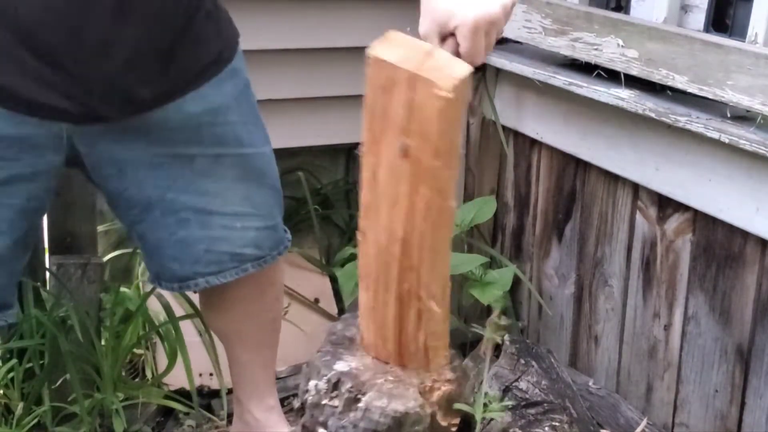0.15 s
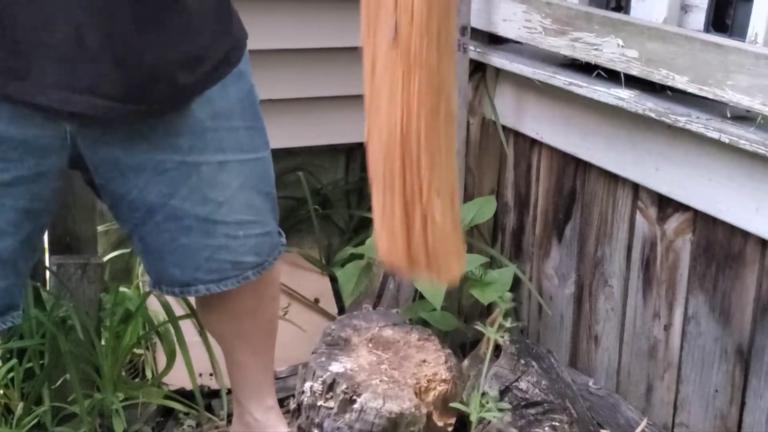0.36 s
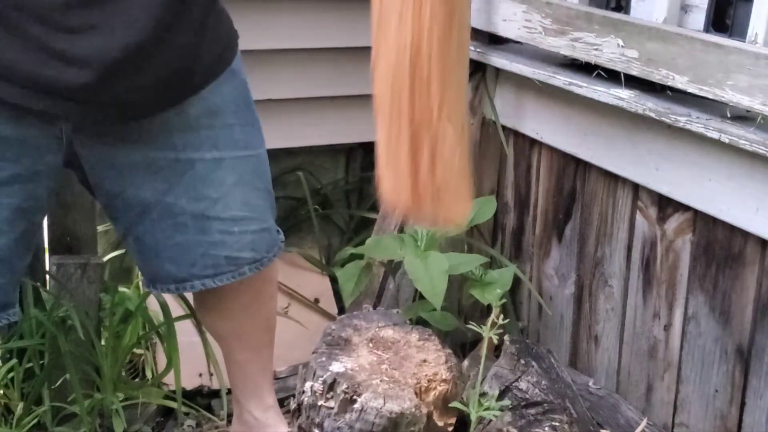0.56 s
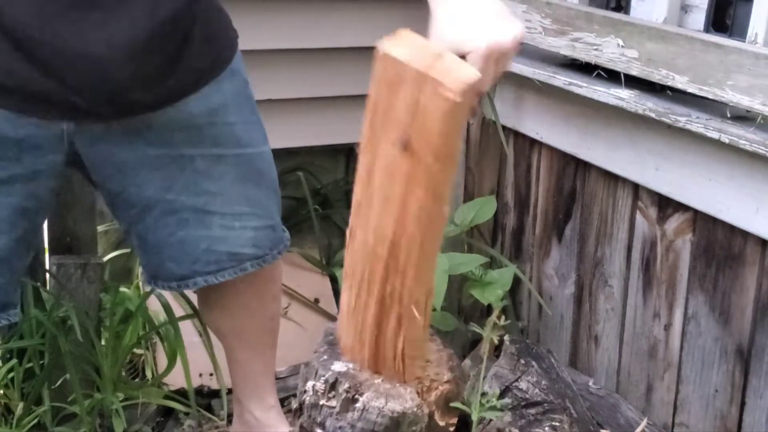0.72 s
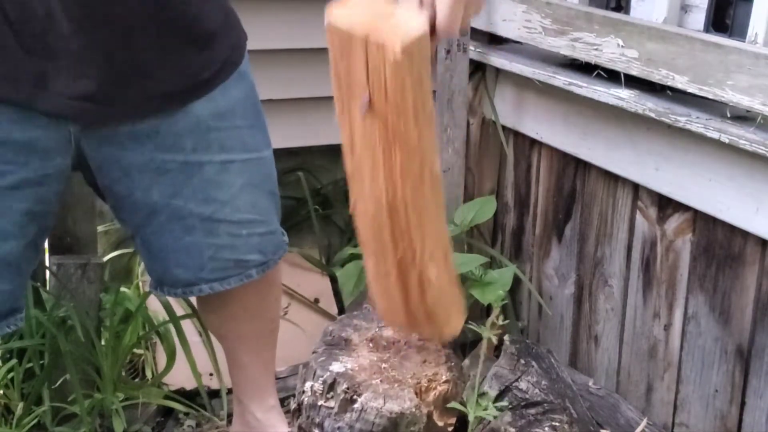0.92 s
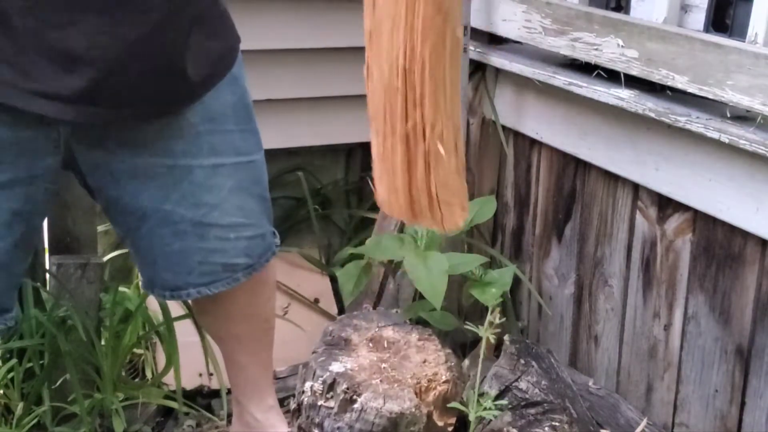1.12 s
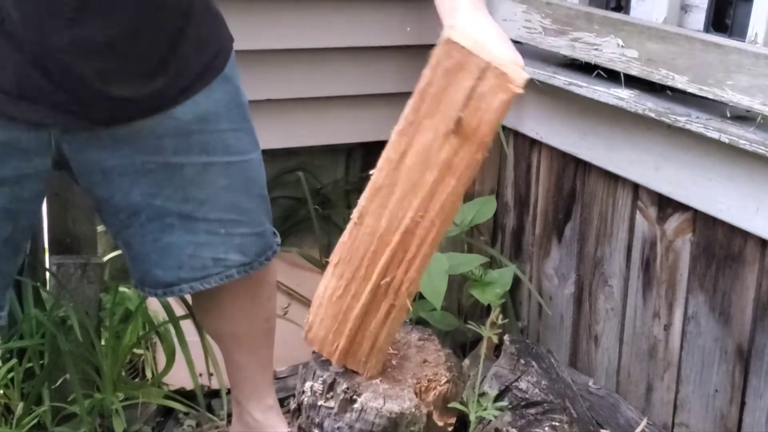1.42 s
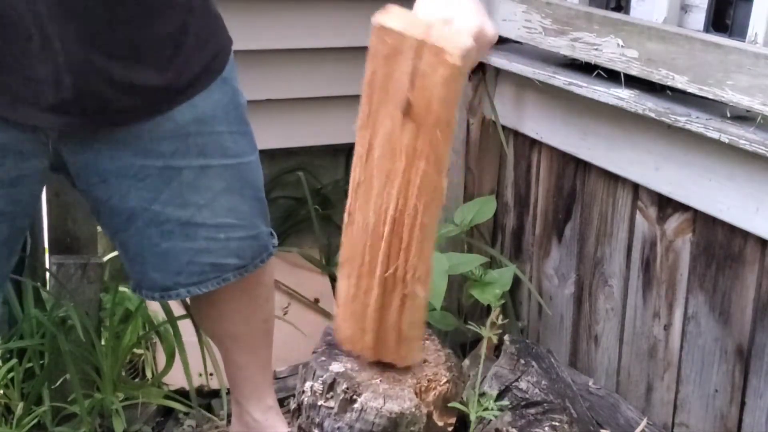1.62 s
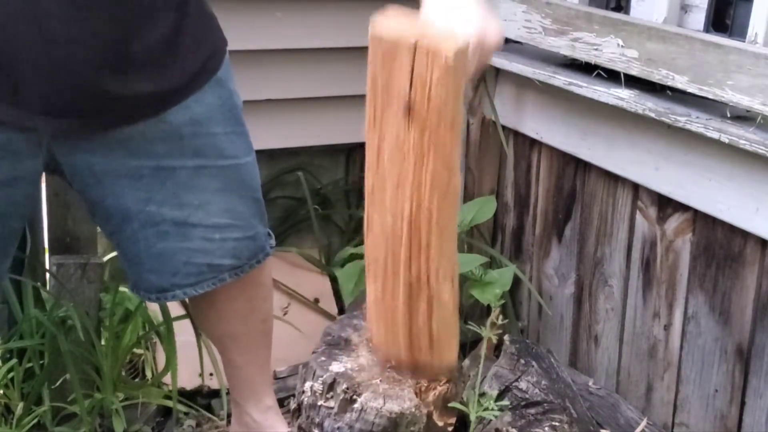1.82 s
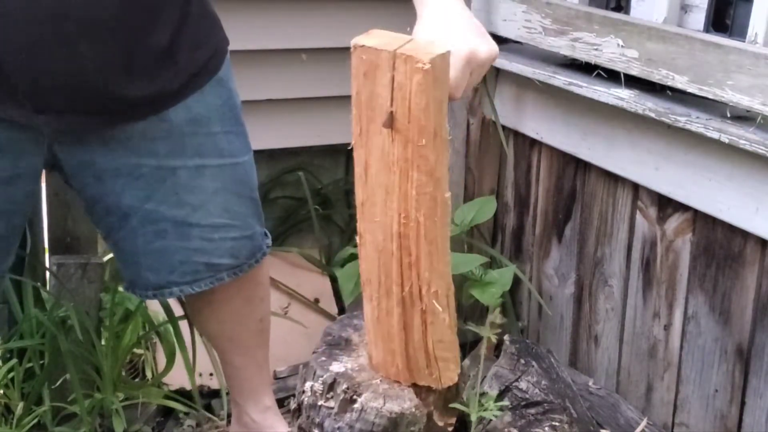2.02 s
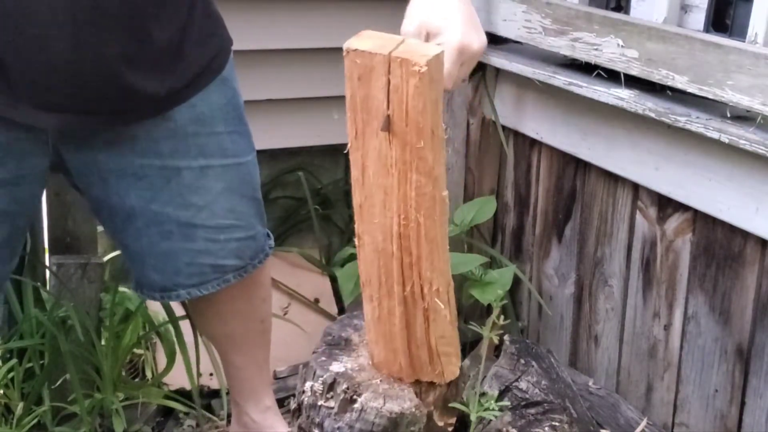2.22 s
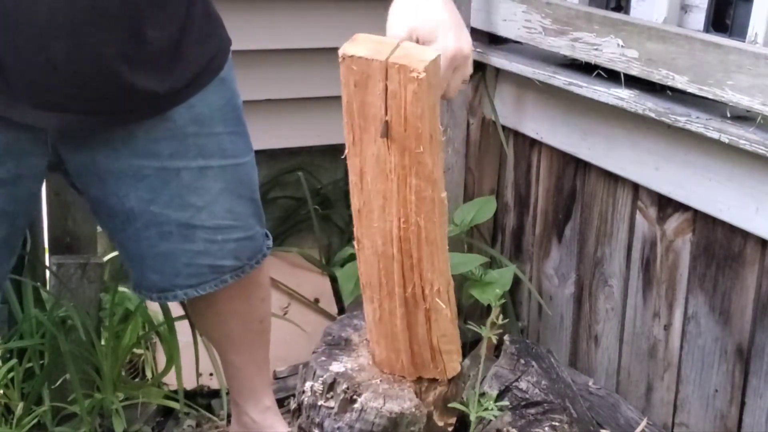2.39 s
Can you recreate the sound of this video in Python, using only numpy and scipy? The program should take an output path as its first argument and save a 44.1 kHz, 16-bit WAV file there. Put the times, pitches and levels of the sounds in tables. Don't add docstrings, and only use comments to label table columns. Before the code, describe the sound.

Three hard, dry wood knocks of a log on a stump, then a faint set-down in a yard

```python
import sys
import numpy as np
from scipy import signal
from scipy.fft import rfft, irfft
from scipy.io import wavfile
from scipy.ndimage import uniform_filter1d

SR = 44100
rng = np.random.default_rng(int(sys.argv[2]) if len(sys.argv) > 2 else 0)


def ratio(d):
    e = np.asarray(d, float) / 20
    return 10 ** e


def generate_wav(signal):
    frames = np.transpose(np.atleast_2d(signal))
    scaled = np.clip(frames, -1, 1) * 32767
    pcm = np.round(scaled).astype(np.int16)
    wavfile.write(sys.argv[1], SR, pcm)


N = 112454
T = np.arange(N) / SR


def fall(t, t60):
    return (t >= 0) * 1000. ** (-np.clip(t, 0, None) / t60)


def curve(table):
    return np.interp(T, *np.array(table).T)


def logf(table, hz):
    a = np.array(table, float)
    return np.interp(np.log(np.maximum(hz, 1)), np.log(a[:, 0]), a[:, 1])


def band(x, hz, width):
    lo = np.sqrt(hz ** 2 + width ** 2 / 4) - width / 2
    sos = signal.butter(2, [lo, min(lo + width, 0.48 * SR)], "band", fs=SR, output="sos")
    return signal.sosfilt(sos, x)


def unit(x):
    return x / np.sqrt(np.mean(x ** 2))


def pan_gains(pan):
    return np.array([[1 + pan], [1 - pan]])


def walk(rate):
    k = int(SR / rate)
    steps = np.repeat(rng.standard_normal(N // k + 1), k)
    return unit(uniform_filter1d(uniform_filter1d(steps, k), k)[:N])


# (frequency [Hz], side share [ratio])
NOISE_WIDTH = [(50, .09), (250, 0.35), (1000, 1), (4000, 1), (12000, 1)]


def wide_noise(colour, flicker_db):
    f = np.fft.rfftfreq(N, 1 / SR)
    mid, side = rfft(rng.standard_normal((2, N))) * ratio(logf(colour, f)) * (f < 15800)
    side = side * logf(NOISE_WIDTH, f)
    ears = np.array([mid + side, mid - side])
    out = 0
    for hz in 20 * 2. ** np.arange(11):
        share = np.clip(1 - abs(np.log2(np.maximum(f, 1) / hz)), 0, 1)
        out = out + irfft(ears * share, N) * ratio(flicker_db * walk(9.13))
    return unit(out)


# (frequency [Hz], t60 [s], level on blow 1 [dB], blow 2 [dB], blow 3 and set-downs [dB])
LOG_TONES = [(210, 0.041, -40.5, -17, -12.5), (294, 0.048, -23.5, -17.5, -6), (391, 0.062, -22, -13, -6),
             (472.4, 0.032, -8, -4, 4), (561.5, 0.033, -10, -7, -5.5), (690.5, 0.058, -21.5, -18, -13.5),
             (827, 0.03, -14, -10.5, -32), (1040, 0.03, -10, -12, -21), (1263, 0.079, -25, -27, -14),
             (1307, 0.078, 0, -2.5, -4), (1408, 0.055, -20, -31, -41.5), (1930, 0.053, -21.5, -44, -18),
             (2340, .045, -15, -23.5, -11.5), (2660, 0.019, -33, -14.5, 1.5)]
SPLIT_SHIFT = (1.0, 1.006, 1.03, 1.1, 1.3)
RING_LAG_S = (0.0001, 0.000083, 0.000993, .003, .0005)
RING_RISE_S = (0.00024, 0.0003, 0.0009, .0003, 0.00032)
THUD_SLOW = (1.01, 1.01, 1.4, 0.83, 1.01)
THUD_DAMP = (0.75, 0.9, 0.79, 0.85, 0.63)
THUD_TOP_HZ, THUD_RISE_S, EAR_TURN_RAD = 950, 0.0014, 0.32


def log_ring(k, t, ring_damp):
    late = t - RING_LAG_S[k]
    swell = -(1 - np.exp(-np.clip(t, 0, None) / (THUD_RISE_S * THUD_SLOW[k])))
    attack = (late > 0) - fall(late, 7 * RING_RISE_S[k])
    ring = 0
    for j, tone in enumerate(LOG_TONES):
        hz, t60, level_db = tone[0], tone[1], tone[2 + min(k, 2)]
        if hz > THUD_TOP_HZ:
            time, damp, onset = SPLIT_SHIFT[k] * late, ring_damp, attack
        else:
            time, damp, onset = t, THUD_DAMP[k], swell
        turn = EAR_TURN_RAD * (-1) ** j * min(hz / THUD_TOP_HZ, 1) * np.array([[1], [-1]])
        phase = 2 * np.pi * hz * time + turn * np.clip(t * hz, 0, 1)
        ring = ring + ratio(level_db) * np.sin(phase) * fall(t, t60 * damp) * onset
    return ring


# (time [s], strength [dB], ring t60 factor [ratio], crack level [dB], crack t60 [s])
BLOWS = [
    (0.2401, 0, 0.58, -29, 0.15),
    (0.8743, 1.5, 0.54, -27, 0.13),
    (1.4944, 1.5, 0.71, -19.5, 0.098),
    (2.048, -37, 0.94, -28.5, 0.093),
    (2.102, -48, 0.49, -35.5, 0.083),
]
# (frequency [Hz], level [dB])
CRACK_COLOUR = [(300, -5), (1000, 12.5), (2500, 6.5), (4500, 2), (7000, -5.5), (10000, -4), (13000, -19.5),
                (16000, -19.5)]
CRACK_RISE_S = (0.000976, 0.00086, 0.0005, 0.0018, 0.00092)
TOUCH_DB = (-27, -21.5, -17.5, -32, -20)
# (frequency [Hz], t60 [s], level [dB])
KNOCK = [(403, 0.049, -30.5), (1034, 0.054, -33.5), (1375, 0.044, -37), (1960, 0.044, -31.5)]
CONTACT_MS, TOUCH_S, KNOCK_S = 0.42, 0.0011, 2.0512


def blows():
    out = np.zeros((2, N))
    fibres = wide_noise(CRACK_COLOUR, 0) * ratio(2.7 * walk(900))
    push = np.hanning(int(CONTACT_MS * SR / 1000) + 2)
    push = push[None] / push.sum()
    length = 9000
    for k, (s, strength_db, damp, crack_db, crack_t60) in enumerate(BLOWS):
        i = int(s * SR)
        ring = log_ring(k, T[i:i + length] - s, damp)
        ring = ratio(strength_db) * signal.fftconvolve(ring, push, axes=1)[:, :length]
        out[:, i:i + length] += ring
        j = i - int(TOUCH_S * SR)
        out[:, j:j + length] += ratio(TOUCH_DB[k]) * ring
        tear = fall(T - s, crack_t60) * np.clip((T - s) / CRACK_RISE_S[k], 0, 1)
        out += ratio(crack_db) * fibres * tear
    t = T - KNOCK_S
    return out + sum(ratio(db) * np.sin(2 * np.pi * hz * t) * fall(t, t60) for hz, t60, db in KNOCK)


def chip_noise(hz, width, passes):
    n = rng.standard_normal((3, N))
    for _ in range(passes):
        n = band(n, hz, width)
    n = unit(n)
    return n[0] + 0.84 * n[1:]


# (time [s], peak level [dB], low part [dB], t60 [s])
CHIPS = [(0.2533, -40, 1, 0.019), (0.2698, -37, 0.5, 0.0092), (0.396, -47.5, -11, 0.0227),
         (0.403, -49, -15, 0.049), (0.5194, -55, -3, 0.03), (0.5514, -52, 1.5, 0.016),
         (0.5876, -53.5, 3, 0.033), (0.6441, -58, -12, 0.031), (0.769, -53.5, -25.5, 0.035),
         (0.884, -44, 16.5, 0.02), (0.8998, -47.5, 8, 0.0082), (0.9114, -48.5, 8.5, 0.0244),
         (0.9428, -44.5, -4, 0.028), (1.001, -50, -0.5, 0.034), (1.042, -46, -4, 0.037),
         (1.0652, -43.5, -1.5, 0.014), (1.0903, -53.5, -6, 0.02), (1.1154, -60, -2.5, 0.016),
         (1.143, -64, -2, 0.011), (1.221, -61, -7, 0.023), (1.5179, -18.5, -13, 0.004),
         (1.931, -45.5, -24, 0.01), (2.0521, -43.5, 14, 0.01), (2.0545, -46.5, 11, 0.018),
         (2.0663, -22.5, -12, 0.008), (2.0676, -33, -12, 0.04), (2.0805, -36, -11, 0.025),
         (2.098, -38, -11.5, 0.021), (2.102, -50.5, 15.5, 0.013), (2.15, -50, -3.5, 0.022),
         (2.159, -57, 5, 0.02), (2.3413, -48.5, 0, 0.02)]
# (start [s], end [s])
HARD_SPELLS = [(1.03, 1.2), (1.5, 1.6), (2.04, 2.12)]
CHIP_DB, LOUDEST_CHIP_DB = -5.5, -24
SHARP_RISE_S, FAINT_RISE_S = 0.0002, 0.0019
SNAP_T60_S, SNAP_DB = 0.003, 9


def chips(bright):
    low = unit(band(rng.standard_normal(N), 2900, 4000))
    top = chip_noise(12900, 5200, 2)
    dim = chip_noise(10500, 4000, 2) * ratio(-4)
    out = 0
    for s, db, low_db, t60 in CHIPS:
        t = T - s
        hard = any(a < s < b for a, b in HARD_SPELLS)
        sharp = hard or (db > -50 and s < HARD_SPELLS[0][0])
        if (db < -48 or s > 1.5) and not hard:
            grain = dim
        else:
            grain = top if s > 1.5 else bright
        rise = np.clip(t / (SHARP_RISE_S if sharp else FAINT_RISE_S), 0, 1)
        decay = fall(t, t60) + hard * ratio(SNAP_DB) * fall(t, SNAP_T60_S)
        level = ratio(min(db + CHIP_DB, LOUDEST_CHIP_DB))
        out = out + level * rise * decay * (grain + ratio(low_db) * low)
    return out


DUST_SHARE_DB = (-8, -12.5, 9, -20, -12.5)
DUST_LENGTH = (1.1, 1.9, 0.48, 0.41, 0.5)
DUST_PER_S, DUST_T60_S, DUST_DB, DUST_SCATTER_DB = 1300, 0.28, -50.5, 2


def dust(bright):
    hits = (rng.random(N) < DUST_PER_S / SR) * ratio(DUST_SCATTER_DB * rng.exponential(size=N))
    patter = signal.fftconvolve(hits, fall(T[:600], 0.011))[:N]
    shower = sum(ratio(db) * fall(T - blow[0], DUST_T60_S * length)
                 for blow, db, length in zip(BLOWS, DUST_SHARE_DB, DUST_LENGTH))
    return ratio(DUST_DB) * patter * shower * bright


# (frequency [Hz], t60 [s], level [dB])
YARD_TAIL = [(302, 0.16, -25), (710, 0.39, -31), (1300, 0.8, -43.5), (2540, 0.64, -29), (4950, 0.55, -19.5),
             (11000, 0.259, -27.5)]
# (delay [s], level [dB], pan [-1 to 1])
FAR_WALLS = [(.058, -35, .3), (.08, -37, 0.2), (.0905, -35, -.2), (.101, -36, .3), (.112, -37, -.3),
             (.135, -41, .4), (.152, -46, -.2), (.21, -53, .3), (.245, -54, -.3), (.268, -52, .2)]
# (time [s], level [dB])
FENCE_SEND = [(.3, -22), (.85, -39), (1.45, -30.5), (2.0, -35)]
# (time [s], level [dB])
YARD_SEND = [(.6, 3.5), (.85, -2.5), (1.45, -9.5), (2.0, 4)]
WALL_S, WALL_DB, WALL_PAN = 0.01075, -19, 0.5
FENCE_S, FENCE_PAN = 0.02638, -0.3
FAR_HZ, LEAF_FLUTTER, LEAF_PER_S = 1300, 0.49, 200


def yard(near):
    x = (near * ratio(curve(YARD_SEND))).mean(0)
    slap = np.roll(band(x, 900, 2400), int((WALL_S - 0.0001) * SR)) * ratio(WALL_DB) * pan_gains(WALL_PAN)
    far = band(x, FAR_HZ, 350)
    walls = sum(np.roll(far, int(s * SR)) * ratio(db) * pan_gains(pan) for s, db, pan in FAR_WALLS)
    walls = walls * (1 + LEAF_FLUTTER * walk(LEAF_PER_S))
    fence = np.roll(far * ratio(curve(FENCE_SEND)), int(FENCE_S * SR)) * pan_gains(FENCE_PAN)
    tail = 0
    for hz, t60, db in YARD_TAIL:
        noise = unit(band(rng.standard_normal((2, SR)), hz, 0.78 * hz))
        tail = tail + ratio(db) * noise * fall(T[:SR] - 0.012, t60)
    return slap + walls + fence + signal.fftconvolve(x[None], 0.022 * tail, axes=1)[:, :N]


def stack(hz, orders, flutter_db):
    phase = 2 * np.pi * np.cumsum(hz) / SR
    ear_phase = 0.082 * np.array([[1], [-1]])
    out = 0
    for k, db in orders:
        level = np.sqrt(2) * ratio(db + flutter_db * walk(20))
        out = out + level * np.sin(k * phase + ear_phase + 2 * np.pi * rng.random())
    return out


# (time [s], level [dB])
MOTOR_LEVEL = [(0.0, -38.5), (0.18, -36.5), (0.59, -48), (0.79, -47.5), (0.999, -43), (1.94, -36),
               (2.24, -38), (2.55, -36)]
# (multiple [ratio], level [dB])
MOTOR_ORDERS = [(2, 1.5), (2.5, -6), (3, -19), (4, -15), (5, -12), (6, -23), (7, -16)]
MOTOR_HZ, MOTOR_WOBBLE, MOTOR_FLUTTER_DB, MOTOR_DB = 44.48, 0.02033, 3.5, -2.5


def motor():
    hz = MOTOR_HZ * (1 + MOTOR_WOBBLE * walk(8))
    return ratio(MOTOR_DB + curve(MOTOR_LEVEL)) * stack(hz, MOTOR_ORDERS, MOTOR_FLUTTER_DB)


# (time [s], firing rate [Hz], engine level [dB], road level [dB])
CAR_PASS = [
    (0, 49.82, -46, -48),
    (.4, 50.23, -54.5, -53.5),
    (1.099, 49.98, -52.5, -60.5),
    (1.45, 51.78, -47.5, -47),
    (1.652, 57.23, -40, -44.5),
    (1.949, 66.64, -36.5, -45),
    (2.099, 70.05, -41, -40.5),
    (2.253, 72.38, -35, -43),
    (2.4, 65.68, -39.5, -43.5),
    (2.55, 62.1, -40.5, -43),
]
# (multiple [ratio], level [dB])
CAR_ORDERS = [(1, 2.5), (2, -10.5), (2.5, -14.5), (3.5, -12.5)]
# (frequency [Hz], level [dB per Hz])
ROAD_COLOUR = [(60, -13), (240, -9.5), (450, -25.5), (1000, -31.5), (3000, -45.5), (7000, -65),
               (10000, -56.5), (16000, -68)]
ROAD_DB, FLICKER_DB = 3.5, 1.5


def car():
    times, *columns = np.array(CAR_PASS).T
    hz, engine_db, road_db = (np.interp(T, times, column) for column in columns)
    engine = ratio(engine_db) * stack(hz * (1 + 0.008 * walk(17)), CAR_ORDERS, 3.2)
    return engine + ratio(road_db + ROAD_DB) * wide_noise(ROAD_COLOUR, FLICKER_DB)


TYRE_HZ, TYRE_WIDTH_HZ, TYRE_DB, TYRE_PASS_S, TYRE_SPAN_S = 743, 284, -50.5, 1.97, 0.22


def tyres():
    n = unit(band(rng.standard_normal((3, N)), TYRE_HZ, TYRE_WIDTH_HZ))
    nearness = 1 / (1 + ((T - TYRE_PASS_S) / TYRE_SPAN_S) ** 2)
    return ratio(TYRE_DB) * (n[0] + 0.34 * n[1:]) * nearness


# (frequency [Hz], level [dB per Hz])
SUBURB_COLOUR = [(25, -19.5), (55, 4), (97, 6.5), (142, -12.5), (313, -9), (500, -19), (3000, -35.5),
                 (16000, -56.5)]
SUBURB_DB = -47


def suburb():
    return ratio(SUBURB_DB) * wide_noise(SUBURB_COLOUR, FLICKER_DB)


def scene():
    bright = chip_noise(11450, 5800, 1)
    near = blows() + chips(bright) + dust(bright)
    return near + yard(near) + motor() + car() + tyres() + suburb()


def band_limit(x):
    return signal.sosfilt(signal.butter(12, 16670, fs=SR, output="sos"), x)


def record(dry):
    x = signal.sosfilt(signal.butter(3, 38.6, "high", fs=SR, output="sos"), dry)
    x = signal.sosfilt(signal.ellip(8, 0.2, 70, 15900, fs=SR, output="sos"), x)
    return band_limit(np.clip(x, -1, 1))


dry = scene()
out = record(dry)
generate_wav(out)
```